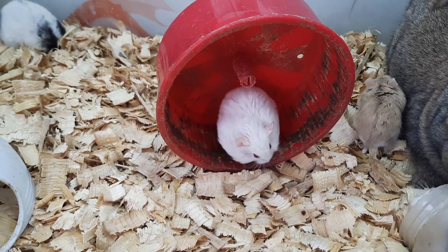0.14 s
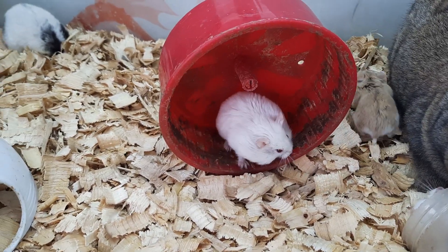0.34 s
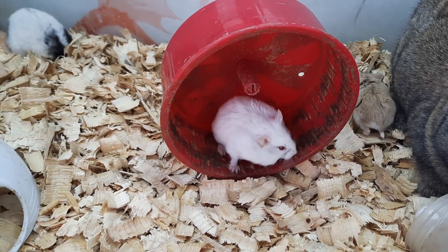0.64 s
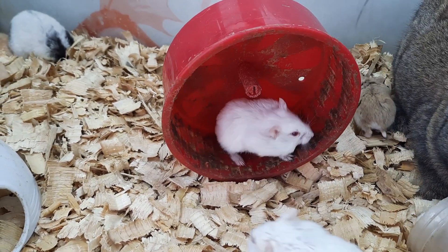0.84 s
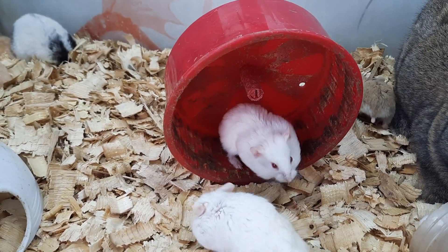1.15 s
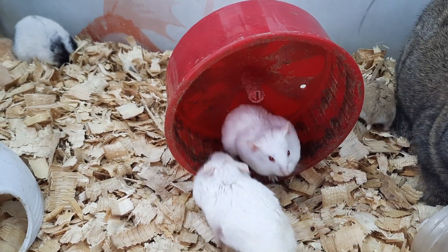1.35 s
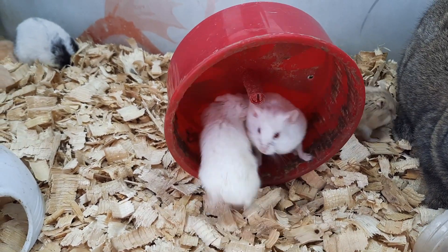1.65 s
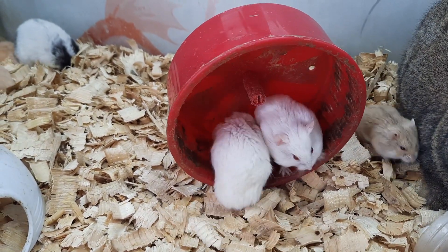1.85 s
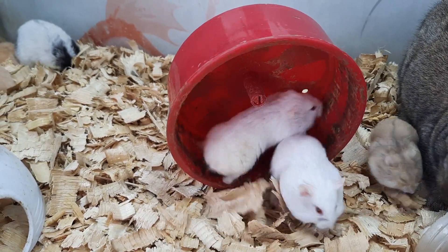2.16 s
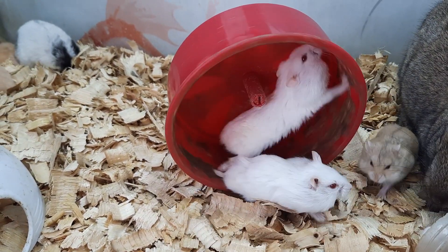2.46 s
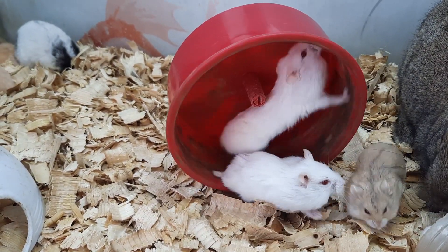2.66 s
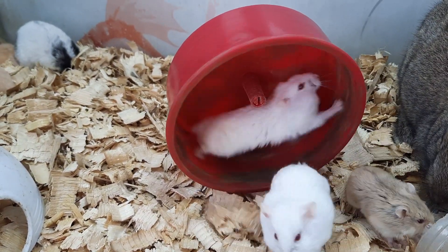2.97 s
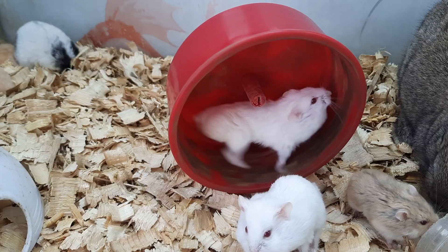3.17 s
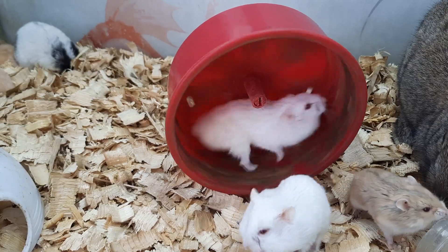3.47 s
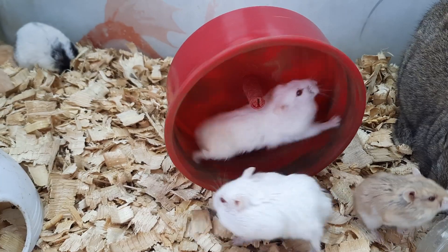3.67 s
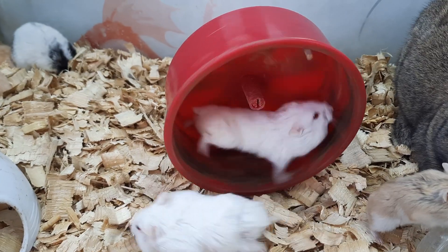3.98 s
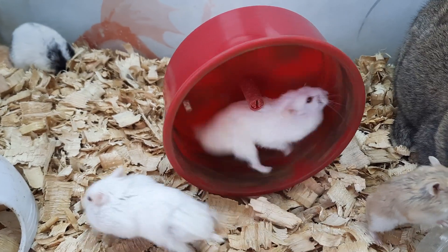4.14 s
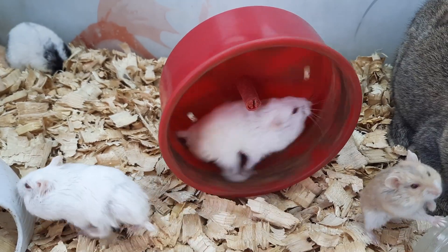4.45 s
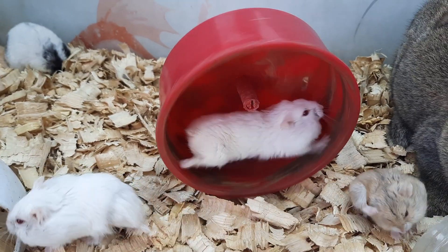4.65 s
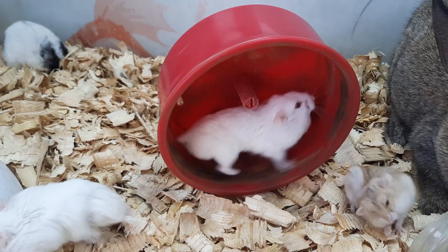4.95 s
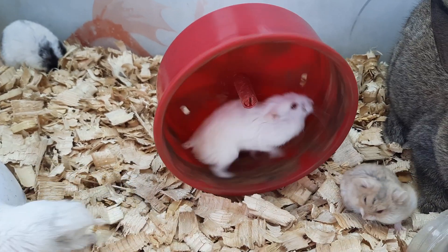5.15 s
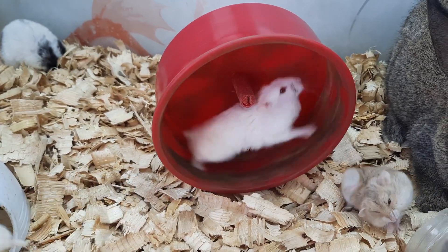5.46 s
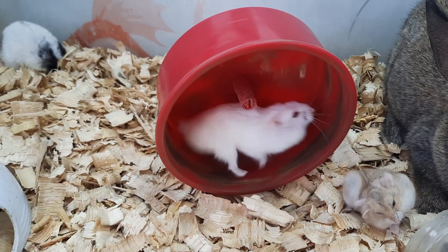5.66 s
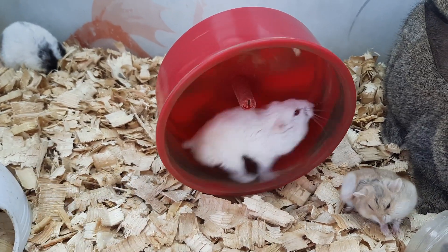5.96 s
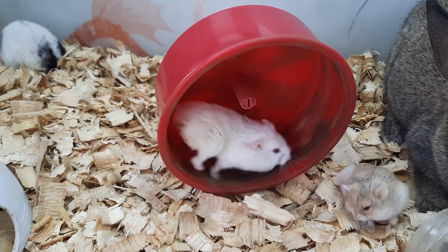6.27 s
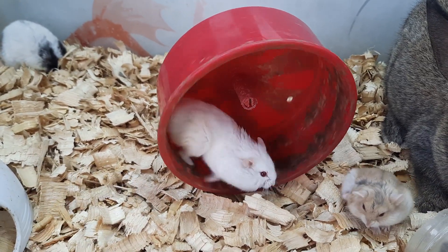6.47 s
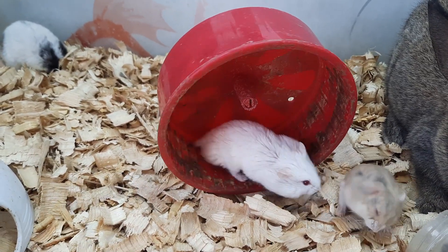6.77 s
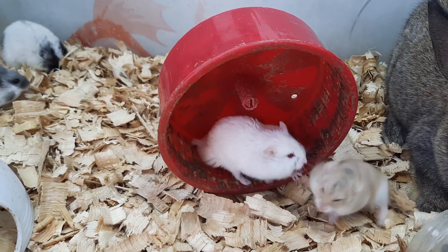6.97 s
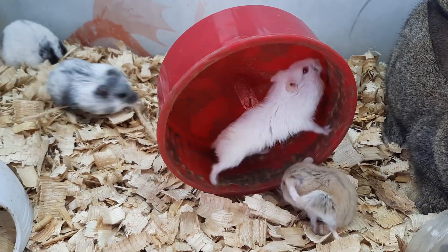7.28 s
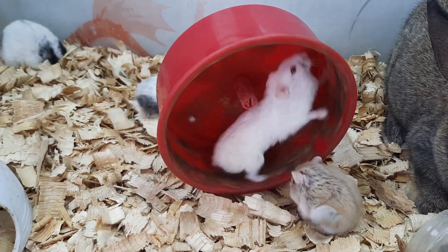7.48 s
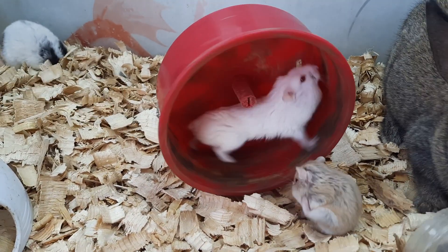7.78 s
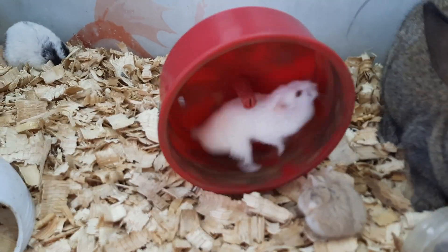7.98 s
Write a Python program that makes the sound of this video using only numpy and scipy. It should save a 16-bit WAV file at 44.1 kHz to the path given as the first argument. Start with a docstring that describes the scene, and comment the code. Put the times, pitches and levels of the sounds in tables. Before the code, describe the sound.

Hamsters patter and knock in a rattling plastic wheel with a squeaky axle, wood shavings crackling and small birds chirping further off.

```python
"""Hamsters in a plastic wheel

Hamsters run in a wheel among wood shavings, which crackle as paws stir them. Feet patter and bodies
knock on the drum, ringing its modes; the dry axle squeaks by stick-slip. Small birds whistle and rasp
further off in the room. A low rumble and room noise lie under it all."""
import sys
import numpy as np
from scipy import signal
from scipy.fft import rfft, irfft, next_fast_len
from scipy.io import wavfile

SR = 44100
rng = np.random.default_rng(int(sys.argv[2]) if len(sys.argv) > 2 else 0)


def unload_audio(sound):
    """Save the sound as a 16-bit wav file, at the path given as the first command line argument."""
    columns = np.transpose(np.atleast_2d(sound))
    # keep every value between -1 and 1, then stretch to whole-number steps
    steps = np.round(np.clip(columns, -1, 1) * 32767)
    wavfile.write(sys.argv[1], SR, steps.astype(np.int16))


N = 358091
FFT_SIZE = next_fast_len(N)
BIN_HZ = np.maximum(np.arange(FFT_SIZE // 2 + 1) * SR / FFT_SIZE, 1)


def from_db(db):
    return 10 ** (np.asarray(db) / 20)


def unit_rms(x):
    return x / np.sqrt(np.mean(x ** 2) + 1e-20)


def over_time(rows):
    """One per-sample curve for each column after the time."""
    times_s, *columns = np.transpose(rows)
    return [np.interp(np.arange(N) / SR, times_s, column) for column in columns]


def over_bins(points):
    """Interpolate (Hz, value) points in log frequency."""
    hz, values = np.transpose(points)
    return np.interp(np.log(BIN_HZ), np.log(hz), values)


def colour(x, points, share=1):
    """Shape the spectrum by (Hz, dB) points; share scales the dB."""
    return irfft(rfft(x, FFT_SIZE) * from_db(share * over_bins(points)), FFT_SIZE)[..., :N]


def butter(x, order, hz, kind="low"):
    return signal.sosfilt(signal.butter(order, hz, kind, fs=SR, output="sos"), x)


def drift(rate_hz):
    """Smooth random wander, RMS 1."""
    r = np.exp(-2 * np.pi * rate_hz / SR)
    return unit_rms(signal.lfilter([1], [1, -2 * r, r * r], rng.standard_normal(N + SR))[SR:])


def ring(force, hz, t60_s):
    """One mode: a unit click starts a decaying sine of height 1."""
    r, w = from_db(-60 / (t60_s * SR)), 2 * np.pi * hz / SR
    return signal.lfilter([0, np.sin(w)], [1, -2 * r * np.cos(w), r * r], force + 1e-18)


def add(track, start_s, sound):
    i = max(round(start_s * SR), 0)
    track[..., i:i + sound.shape[-1]] += sound[..., :N - i]


def grains(per_s, spread_db):
    """Random clicks of uneven size."""
    sizes = from_db(spread_db * np.minimum(rng.exponential(1, N), 5)) * rng.choice([-1, 1], N)
    return sizes * (rng.random(N) < per_s / SR)


def reverb(x, t60_s):
    """Reflections: a decaying noise tail per channel, mean energy 1."""
    t = np.arange(int(SR * .6)) / SR
    tail = rng.standard_normal((2, len(t))) * from_db(-60 * t / t60_s) * (t > .003)
    return signal.fftconvolve(x[None], tail / np.sqrt(np.sum(tail ** 2) / 2))[:, :N]


# Likeness of the channels. Each row: frequency in Hz, left-right correlation.
CORRELATION = [(100, 0.97), (300, 0.87), (700, 0.11), (2000, 0.0064), (16000, 0.014)]


def stereo(mid, side):
    """Mix two unrelated signals into channels alike in the bass, unlike in the treble."""
    alike = over_bins(CORRELATION)
    common = np.sqrt(1 + alike) * rfft(mid, FFT_SIZE)
    opposed = np.sqrt(1 - alike) * rfft(side, FFT_SIZE) * [[1], [-1]]
    return irfft((common + opposed) / np.sqrt(2), FFT_SIZE)[:, :N]


# Room noise spectrum. Each row: frequency in Hz, gain in dB.
ROOM_SPECTRUM = [(30, -15), (95, 6.5), (125, 6.5), (204, -7.5), (303, 4), (473, -19.5), (666, -8),
                 (962, -12.5), (2150, -18.5), (5900, -30.5), (9000, -50), (12600, -57), (16000, -47)]
# Rumble envelope. Each row: time in seconds, level in dB.
RUMBLE_LEVELS = [(0.0, -32), (1.94, -32), (2.08, -39.5), (3.1, -29.5), (3.6, -32), (5.3, -34.5), (5.8, -27),
                 (6.3, -34), (8.12, -30.5)]


def background(noise_db=-37):
    """Steady room noise and a wavering low rumble."""
    mid, side = colour(rng.standard_normal((2, N)), ROOM_SPECTRUM)
    rumble = ring(rng.standard_normal(N), hz=66.1, t60_s=0.29)
    rumble = unit_rms(butter(rumble, 2, [40, 100], "band"))
    rumble_db, = over_time(RUMBLE_LEVELS)
    return from_db(noise_db) * unit_rms(stereo(mid, side)) + from_db(rumble_db) * rumble


# Hamster activity. Each row: time in seconds, foot patter in dB, stirring of shavings in dB.
ACTIVITY = [(0.0, -51.5, -42), (2.87, -47.5, -43), (3.48, -37, -49), (3.87, -41, -40), (4.5, -35, -49),
            (4.84, -39, -39), (7.0, -41.5, -46), (7.6, -38, -42.5), (7.82, -30.5, -51.5), (8.12, -40, -44)]
# Paw sweeps. Each row: start in seconds, peak in dB, length in seconds before clamping.
PAW_SWEEPS = [(0.31, -41.5, 0.18), (0.626, -40, 0.024), (1.122, -34, 0.13), (1.181, -29.5, 0.012),
              (1.202, -28, 0.0089), (1.203, -27.5, 0.026), (1.383, -39.5, 0.018), (1.534, -38.5, 0.048),
              (2.007, -28, 0.041), (2.444, -35.5, 0.093), (2.938, -36.5, 0.025), (3.632, -36.5, 0.028),
              (4.194, -25, 0.0096), (4.834, -39, 0.11), (5.24, -36.5, 0.077), (5.63, -37.5, 0.2),
              (5.744, -36.5, 0.23), (6.118, -39.5, 0.071), (6.523, -37.5, 0.17), (7.64, -29.5, 0.099)]
# Flake crackle, heard through the microphone's 9 kHz notch. Each row: frequency in Hz, gain in dB.
FLAKE_SPECTRUM = [(1000, 9), (2500, 7.5), (6500, 6), (8000, -2), (9000, -16.5), (11000, -1), (13000, 4),
                  (16000, 6.5)]


def shavings(stirring_db):
    """Dry flakes crackle densely throughout, and in gusts as paws sweep through them."""
    level = from_db(stirring_db + 2.6 * drift(18))
    for start_s, db, length_s in PAW_SWEEPS:
        gust = np.hanning(int(np.clip(length_s, .01, .15) * SR))
        add(level, start_s - .005, from_db(db) * gust)
    mid, side = (unit_rms(colour(grains(7000, spread_db=3.2), FLAKE_SPECTRUM)) for _ in range(2))
    return level * stereo(mid, side)


# Wheel drum modes. Each row: frequency in Hz, gain in dB, T60 in seconds before clamping.
DRUM_MODES = [(178, -8, 0.054), (243.5, -6.5, 0.099), (297.2, -1.5, 0.038), (394, -7.5, 0.1),
              (551, -0.5, 0.015), (675, -2.5, 0.043), (780, 2, 0.011), (973, -2.5, 0.034),
              (1377, -3, 0.018), (1890, -10, 0.027), (3093, 0, 0.024), (4480, -8.5, 0.0078)]
BOOM_HZ, BOOM_T60_S = 123.6, 0.13


def drum(forces):
    """Each drum mode rings under its own force; neighbours swing in opposite senses."""
    return sum((-1) ** k * from_db(db) * ring(forces[k], hz, np.clip(t60_s, .01, .14))
               for k, (hz, db, t60_s) in enumerate(DRUM_MODES))


# Click of a hard contact on plastic, heard through the microphone's 9 kHz notch.
# Each row: frequency in Hz, gain in dB.
NOTCHED_CRACK = [(500, 10.5), (1000, 18), (2000, 9.5), (4500, 3), (7000, -4.5), (9000, -34), (13000, -16),
                 (16000, -25)]


def patter(level_db):
    """Small feet land in uneven clumps: soft pads make the drum hum and boom, claws tick."""
    steps = grains(per_s=150 * from_db(6 * drift(12)), spread_db=2.0)
    pads = butter(steps, 3, hz=380)
    hum = unit_rms(drum([pads] * len(DRUM_MODES)))
    boom = unit_rms(ring(steps, BOOM_HZ, BOOM_T60_S))
    claws = unit_rms(colour(steps, NOTCHED_CRACK))
    return from_db(level_db) * (hum + from_db(-1.5) * boom + from_db(-6.5) * claws)


# Knocks on the drum. Each row: start in seconds, body, boom and crack drive in dB,
# rattle length in seconds.
DRUM_KNOCKS = [(0.388, -23.5, -24, -28, 0.053), (1.17, -10, -7, -24, 0.017), (1.198, -36, -27, -27, 0.042),
               (1.642, -15.5, -30, -39, 0.044), (1.803, -9.5, -13.5, -23, 0.017),
               (2.004, -5, -8.5, -21, 0.026), (2.455, -27, -29, -26, 0.029),
               (2.948, -20.5, -40, -38.5, 0.019), (3.123, -23, -29, -49, 0.026),
               (3.326, -6.5, -34, -17.5, 0.039), (3.588, -13.5, -28.5, -23, 0.015),
               (3.92, -16.5, -26, -22, 0.015), (3.997, -19, -36, -27, 0.024), (4.11, -18.5, -26, -21, 0.04),
               (4.195, -20, -40, -25, 0.019), (4.366, -11.5, -38, -20.5, 0.066),
               (4.597, -17.5, -43, -27, 0.035), (4.642, -16, -20, -18.5, 0.024),
               (4.675, -5.5, -22, -17, 0.058), (4.719, -16.5, -38, -27, 0.025),
               (4.776, -8.5, -20.5, -19.5, 0.046), (4.838, -14.5, -25, -21.5, 0.023),
               (5.044, -15.5, -23.5, -31, 0.06), (5.119, -9, -23, -19, 0.034),
               (5.267, -5.5, -14, -29, 0.032), (5.306, -13.5, -36, -26, 0.03),
               (5.941, -19, -25, -23.5, 0.015), (6.053, -15.5, -30, -22, 0.023),
               (6.294, -22.5, -36, -34, 0.033), (6.333, -19, -26.5, -37, 0.034),
               (6.424, -21, -32, -38, 0.01), (6.513, -21.5, -29.5, -50, 0.015),
               (6.627, -22, -28.5, -40.5, 0.026), (7.675, -15.5, -25, -26, 0.025),
               (7.741, -13, -29, -30.5, 0.052), (7.829, -13, -46, -23, 0.02),
               (7.866, -11.5, -21.5, -24.5, 0.041), (7.926, -10, -35, -22, 0.036),
               (7.992, -28, -24, -27, 0.02)]
WALL_FROM_HZ, RIM_FROM_HZ = 480, 1150
BODY_LAG_S, BOOM_LAG_S = .003, .007


def knocks():
    """Each knock is a short rattle of contacts that rings the drum's body, wall and rim unequally."""
    force, boom, crack = np.zeros((len(DRUM_MODES), N)), np.zeros(N), np.zeros(N)
    mode_hz = np.array(DRUM_MODES)[:, 0]
    part = np.searchsorted([WALL_FROM_HZ, RIM_FROM_HZ], mode_hz)   # 0 body, 1 wall, 2 rim
    t = np.arange(SR // 10) / SR
    soft_push = np.hanning(SR // 300) / (SR // 600)
    for start_s, body_db, boom_db, crack_db, length_s in DRUM_KNOCKS:
        sizes, noise = rng.standard_normal((2, len(t)))
        swell_s = .2 * length_s
        envelope = np.minimum(t / swell_s, 1) * np.exp(-(t / np.clip(length_s, .004, .06)) ** 3)
        contacts = sizes * (np.abs(noise) > 2.6) * envelope
        contacts[int(swell_s * SR)] += 1.7   # main blow
        wall_db = 1 + crack_db + 0.97 * (boom_db - crack_db)   # heavy blows flex the wall most
        scatter_db = 2.7 * sizes[-len(DRUM_MODES):]
        mode_gains = from_db(np.array([body_db, wall_db, crack_db])[part] + scatter_db)
        blow = mode_gains[:, None] * contacts / np.sqrt(np.sum(contacts ** 2))
        add(force, start_s, blow * (part > 0)[:, None])
        add(force, start_s + BODY_LAG_S, blow * (part == 0)[:, None])
        add(boom, start_s + BOOM_LAG_S, from_db(boom_db) * soft_push)
        add(crack, start_s, from_db(crack_db) * envelope * (0.2 * noise + 2.0 * contacts))
    ringing = butter(drum(force), 2, hz=5000)   # the ringing carries little above 5 kHz
    return ringing + ring(boom, BOOM_HZ, BOOM_T60_S) + colour(crack, NOTCHED_CRACK)


def whistle(start_s, length_s, first_hz, last_hz, swing_hz, arch_hz=0):
    """Phase and envelope of a bird's note: a glide, quick at first, bowed upward by arch_hz."""
    u = np.linspace(0, 1, int(length_s * SR))
    glide_hz = first_hz + (last_hz - first_hz) * u ** .8 + arch_hz * np.sin(np.pi * u)
    hz = glide_hz + swing_hz[int(start_s * SR):][:len(u)]
    return 2 * np.pi * np.cumsum(hz) / SR, np.sin(np.pi * u ** 0.65)


# Single whistles. Each row: start and length in seconds, first and last pitch in Hz, relative dB.
BIRD_CHIRPS = [(0.63, 0.068, 3320, 5020, -31.5), (1.112, 0.08, 2384, 3695, -29.5),
               (1.14, 0.096, 1924, 1893, -32.5), (1.2, 0.048, 2375, 2380, -35.5),
               (2.345, 0.066, 3460, 4790, -28), (2.847, 0.1, 1690, 1836, -40),
               (4.225, 0.052, 1610, 1905, -34.5), (3.09, 0.14, 3060, 3090, -41),
               (4.275, 0.038, 2405, 2680, -25.5), (4.328, 0.035, 2440, 2360, -33),
               (4.31, 0.14, 2910, 3680, -36), (5.067, 0.068, 4430, 3090, -32.5),
               (5.155, 0.04, 3660, 3780, -32.5), (5.12, 0.063, 3220, 3190, -33),
               (5.413, 0.057, 3970, 3940, -37), (5.449, 0.075, 3090, 3260, -36),
               (6.005, 0.1, 3560, 3830, -35.5), (6.104, 0.082, 3030, 2740, -39.5),
               (6.51, 0.13, 4000, 3310, -40), (7.273, 0.054, 3270, 2900, -37.5),
               (7.312, 0.078, 3760, 4470, -33), (7.335, 0.06, 3590, 3730, -35)]
# Lower voice of two-voiced notes. Each row: start and length in seconds, first and last pitch in Hz,
# relative dB.
LOWER_VOICE = [(0.502, 0.105, 3210, 4070, -35.5), (2.208, 0.099, 3630, 3550, -34.5),
               (3.862, 0.147, 3456, 3574, -36.5), (6.612, 0.1, 3690, 3504, -34.5)]
# Harsh cries. Each row: start and length in seconds, first pitch, last pitch and rasp swing in Hz,
# voice and lower octave in relative dB.
BIRD_CRIES = [(1.541, 0.078, 6530, 5790, 260, -28, -47.5), (2.553, 0.094, 6046, 6340, 200, -32, -29.5),
              (3.074, 0.12, 4460, 5090, 645, -29.5, -61), (3.175, 0.068, 5050, 5380, 573, -30, -59),
              (4.232, 0.19, 4220, 4765, 670, -42, -34)]
# Microphone notch near 9 kHz, applied to the birdsong. Each row: frequency in Hz, gain in dB.
MIC_NOTCH = [(8000, 1.5), (9200, -23), (11500, -6.5)]
UPPER_GLIDE_HZ, UPPER_DB, UPPER_LENGTH_SHARE = (4670, 4880), -2.5, 0.635


def birds():
    """Gliding whistles with a fast uneven warble, some two-voiced, and rasping cries with octaves."""
    out = np.zeros(N)
    warble = 2.4 * np.tanh(drift(169) / 2)
    waver_hz = 55 * drift(25)
    upper_voice = [(start_s, UPPER_LENGTH_SHARE * length_s, *UPPER_GLIDE_HZ, db + UPPER_DB)
                   for start_s, length_s, *_, db in LOWER_VOICE]
    for notes, warble_hz, arch_hz in ((BIRD_CHIRPS, 158, 0), (LOWER_VOICE + upper_voice, 90, 260)):
        swing_hz = warble_hz * warble + waver_hz
        for start_s, length_s, first_hz, last_hz, db in notes:
            phase, swell = whistle(start_s, length_s, first_hz, last_hz, swing_hz, arch_hz)
            add(out, start_s, from_db(db) * np.sin(phase) * swell)
    for start_s, length_s, first_hz, last_hz, rasp_hz, db, lower_db in BIRD_CRIES:
        phase, swell = whistle(start_s, length_s, first_hz, last_hz, rasp_hz * warble)
        voice = np.sin(phase) + from_db(-10.5) * np.sin(2 * phase)
        add(out, start_s, (from_db(db) * voice + from_db(lower_db) * np.sin(phase / 2)) * swell)
    flutter_db = 4.5 * (drift(122) - 1)
    return colour(out * from_db(flutter_db), MIC_NOTCH)


# Axle slips. Each row: start and length in seconds, first and last pitch in Hz, relative peak in dB,
# overtone gain in dB.
AXLE_SLIPS = [(3.313, 0.0086, 2980, 2870, -22, -24), (3.398, 0.032, 3030, 3030, -31, -30),
              (3.423, 0.023, 2930, 2930, -18.5, -4), (3.507, 0.043, 3076, 2710, -16, -9.5),
              (3.843, 0.019, 3190, 2880, -18, -11), (3.944, 0.0068, 3110, 2730, -17, -6.5),
              (4.064, 0.04, 2890, 3118, -17, -1.5), (4.221, 0.041, 3300, 2775, -25, -13.5),
              (4.421, 0.018, 2864, 2906, -17, -5), (4.528, 0.025, 2870, 2830, -17, -8),
              (4.613, 0.025, 3084, 2780, -20, -18), (4.678, 0.065, 3010, 2990, -27.5, -16),
              (4.918, 0.033, 2940, 2980, -16, -9), (5.095, 0.026, 3110, 2775, -25, -6.5),
              (5.209, 0.026, 3080, 2750, -29.5, -12), (5.336, 0.018, 2865, 2940, -20.5, -28),
              (5.618, 0.036, 3094, 2940, -16.5, -13), (5.758, 0.025, 3020, 3070, -17, -16),
              (5.899, 0.037, 3040, 2794, -25.5, -7.5), (6.264, 0.012, 2980, 2810, -20.5, -12),
              (7.569, 0.057, 3080, 2830, -34.5, -13), (7.796, 0.026, 2794, 2800, -25, -15),
              (7.914, 0.008, 3070, 2880, -20.5, -6)]
# Squeak overtones. Each row: harmonic number, relative level in dB.
AXLE_OVERTONES = [(2, 0.5), (3, -33.5), (4, -21), (5, -25)]


def squeaks(right_lag_s=.0001):
    """Stick-slip at the dry axle: short gliding tones, each with its own strength of overtones."""
    out, wobble_hz = np.zeros(N), 60 * drift(83)
    for start_s, length_s, first_hz, last_hz, db, overtones_db in AXLE_SLIPS:
        u = np.linspace(0, 1, int(length_s * SR))
        hz = first_hz + (last_hz - first_hz) * u + wobble_hz[int(start_s * SR):][:len(u)]
        phase = 2 * np.pi * np.cumsum(hz) / SR
        swell = np.sin(np.pi * u) ** 0.67
        overtones = sum(from_db(gain_db) * np.sin(k * phase) for k, gain_db in AXLE_OVERTONES)
        tone = np.sin(phase) + from_db(overtones_db) * swell * overtones
        add(out, start_s, from_db(db) * tone * swell)
    left = out * from_db(2.2 * (drift(120) - .6))   # the grip comes and goes
    right = np.interp(np.arange(N) - right_lag_s * SR, np.arange(N), left)
    return np.array([left, right])


def scene():
    """Wheel and shavings close by in the pen, birds further off in the room."""
    patter_db, stirring_db = over_time(ACTIVITY)
    wheel = knocks() + patter(patter_db)
    axle, song = squeaks(), birds()
    pen_echo = reverb(wheel, t60_s=0.052)
    near_wheel = stereo(wheel, pen_echo[0]) + from_db(-10) * pen_echo[1]
    near_axle = axle + reverb(axle[0], t60_s=0.035)
    far_birds = from_db(-4) * song + from_db(6) * reverb(song, t60_s=0.22)
    return near_wheel + near_axle + far_birds + shavings(stirring_db) + background()


# Microphone port imbalance. Each row: frequency in Hz, left minus right in dB.
PORT_BALANCE = [(60, 1), (200, 3), (380, -1), (1000, 5), (4400, 0.7), (7000, -6), (10000, 16), (16000, 6.5)]


def record(dry, stopband_hz=16250):
    """Two microphone ports differ in colour and lose the deepest bass; peaks clip, the top is cut."""
    left = colour(dry[0], PORT_BALANCE, share=.5)
    right = colour(dry[1], PORT_BALANCE, share=-.5)
    ports = butter(np.array([left, right]), 6, hz=46, kind="high")
    top_cut = signal.cheby2(16, 60, stopband_hz, fs=SR, output="sos")
    return signal.sosfilt(top_cut, np.clip(ports, -1, 1))


dry = scene()
out = record(dry)
unload_audio(out)
```